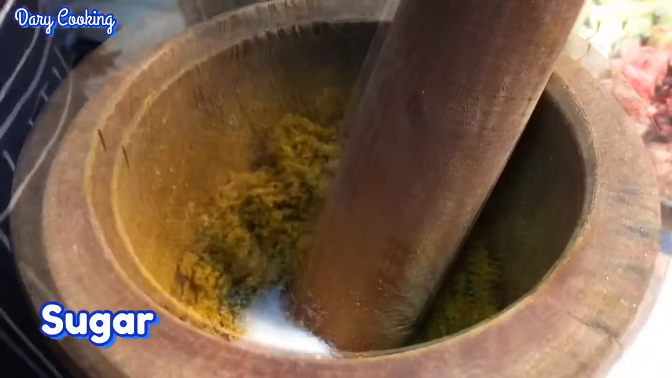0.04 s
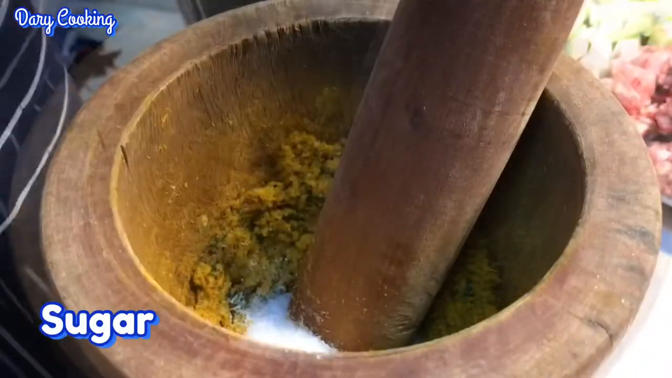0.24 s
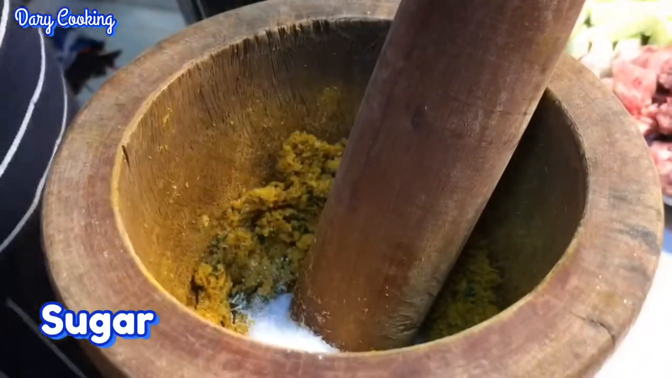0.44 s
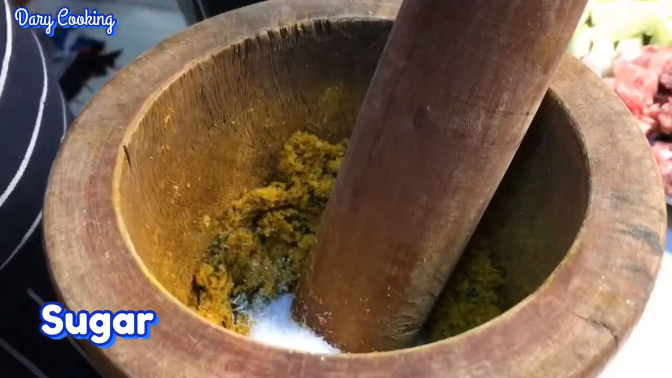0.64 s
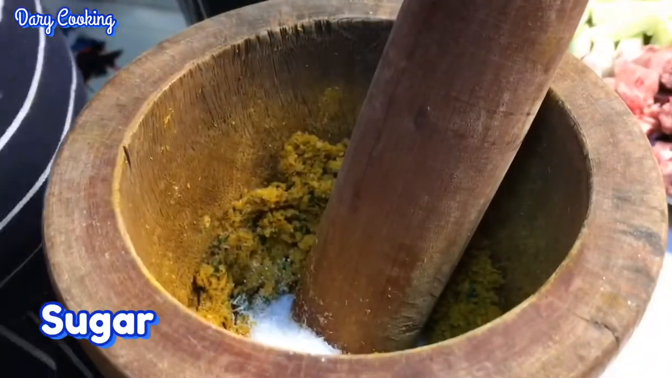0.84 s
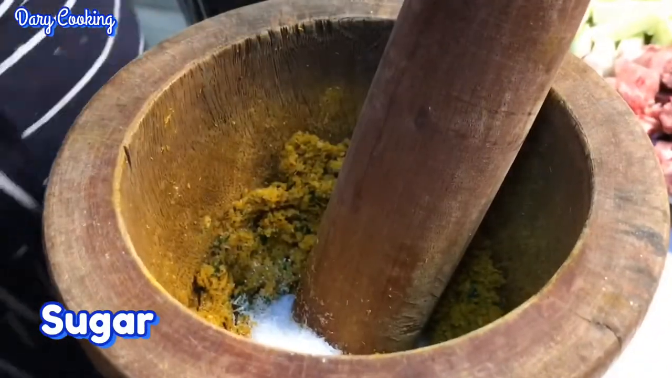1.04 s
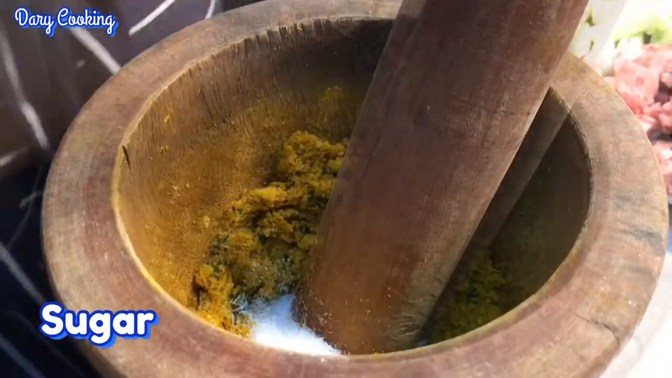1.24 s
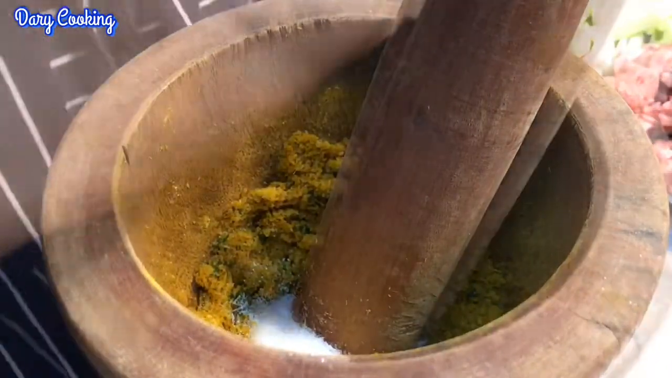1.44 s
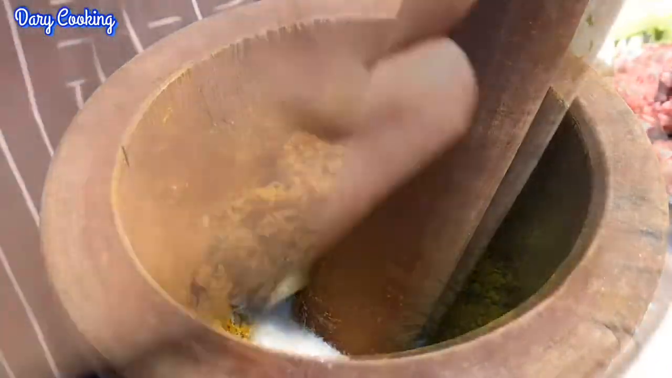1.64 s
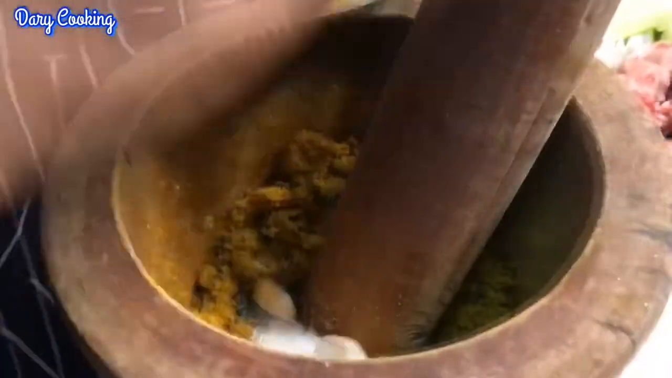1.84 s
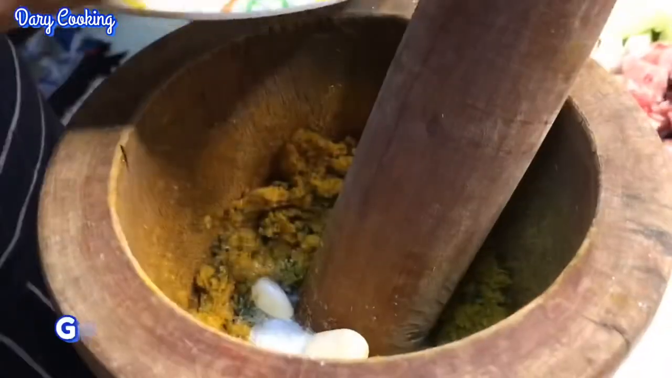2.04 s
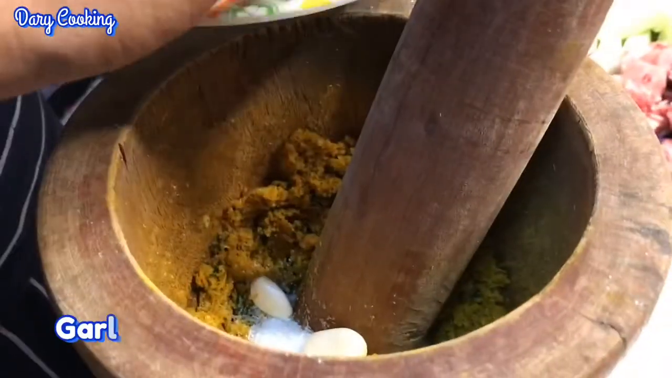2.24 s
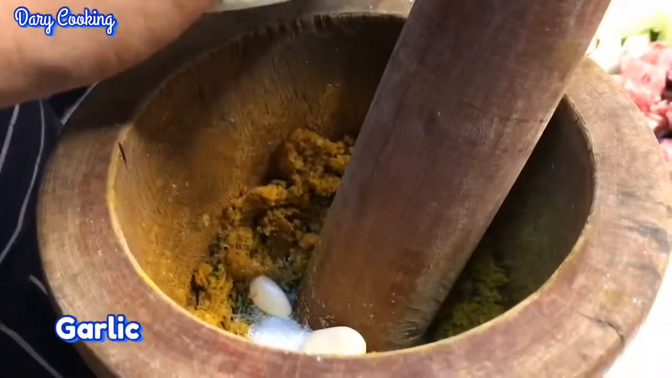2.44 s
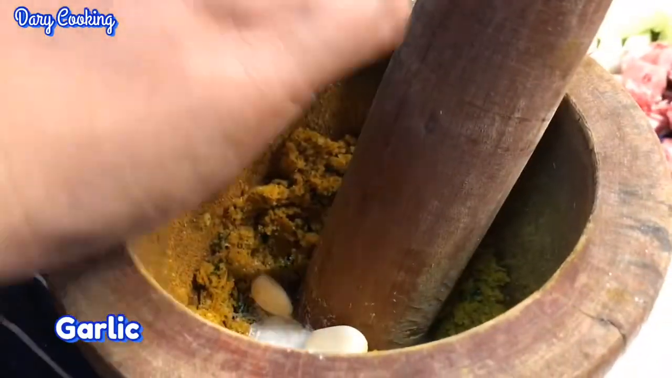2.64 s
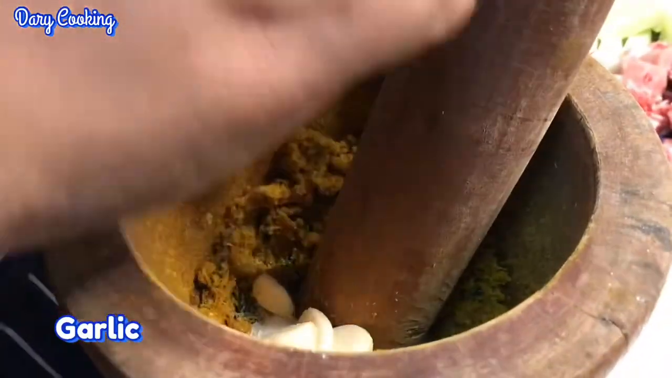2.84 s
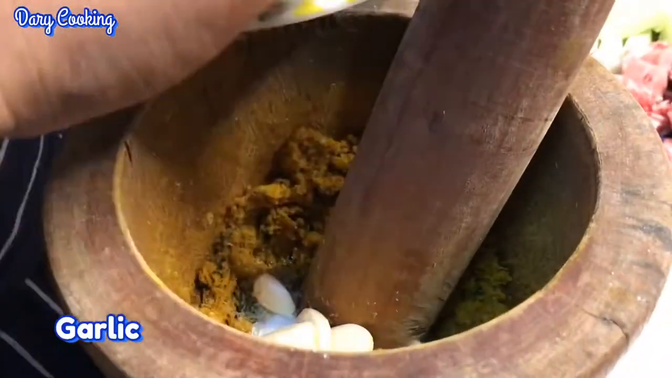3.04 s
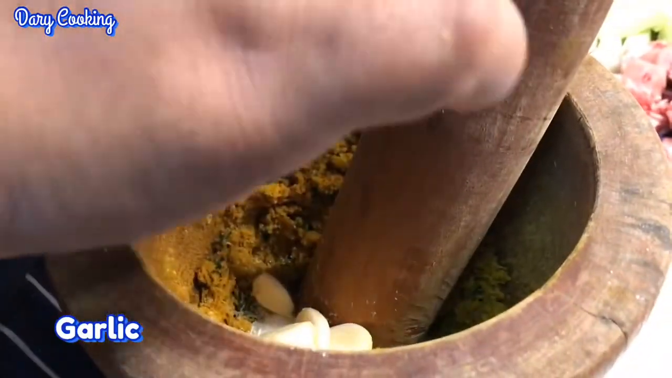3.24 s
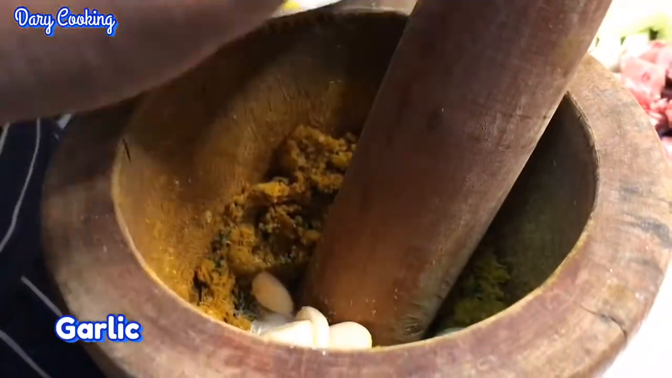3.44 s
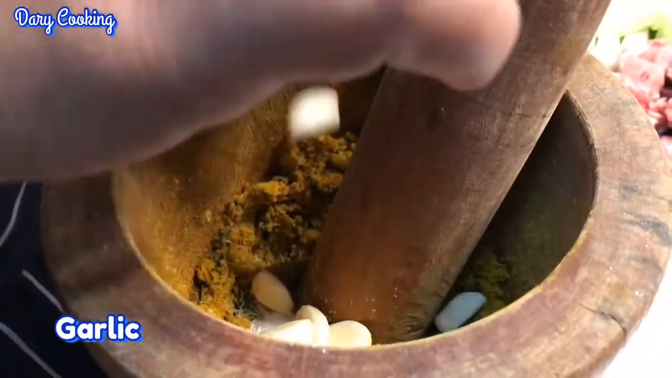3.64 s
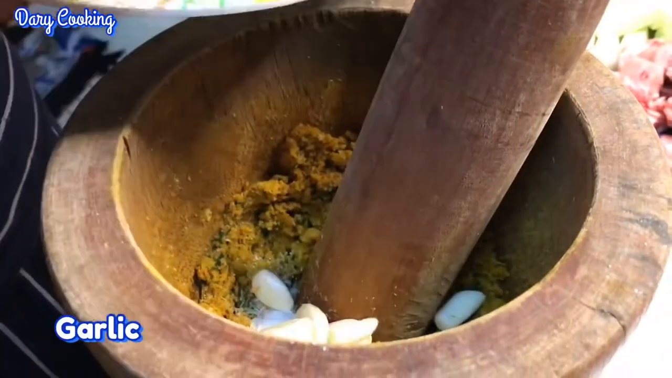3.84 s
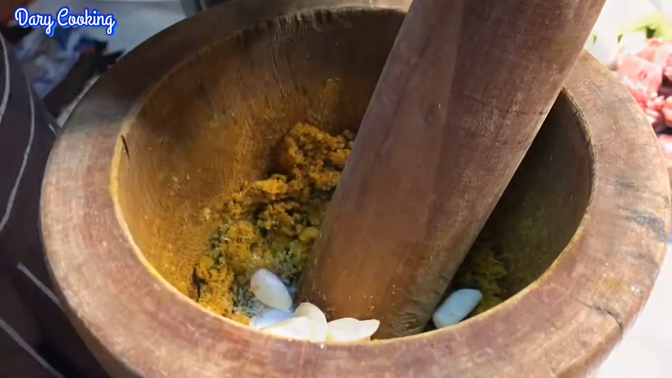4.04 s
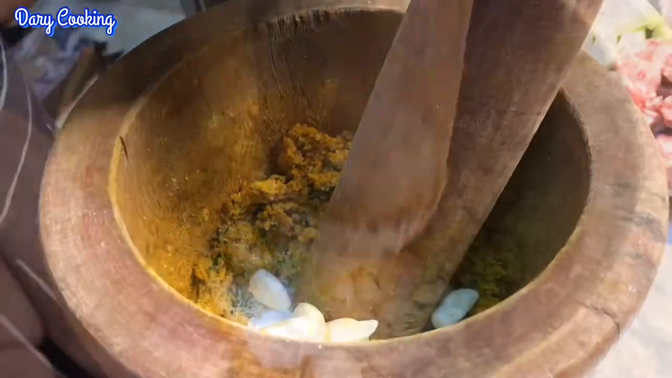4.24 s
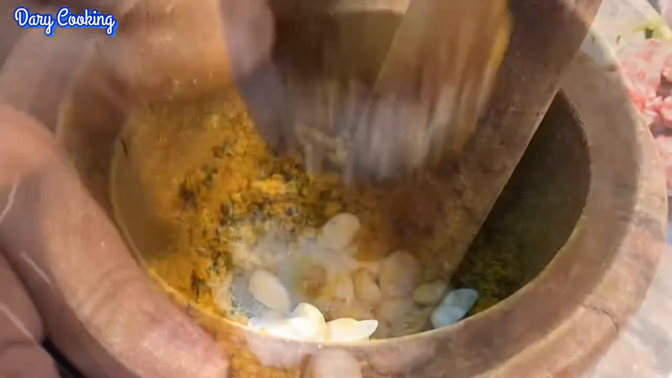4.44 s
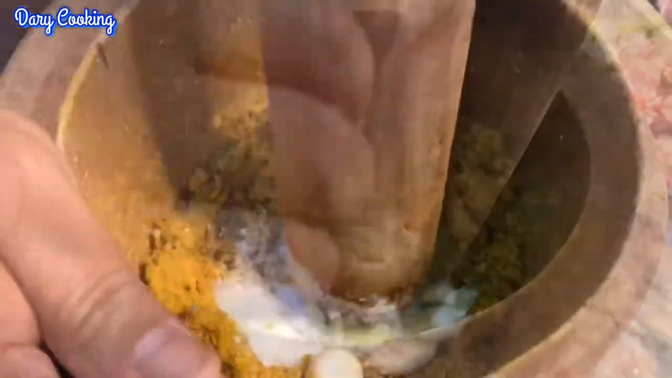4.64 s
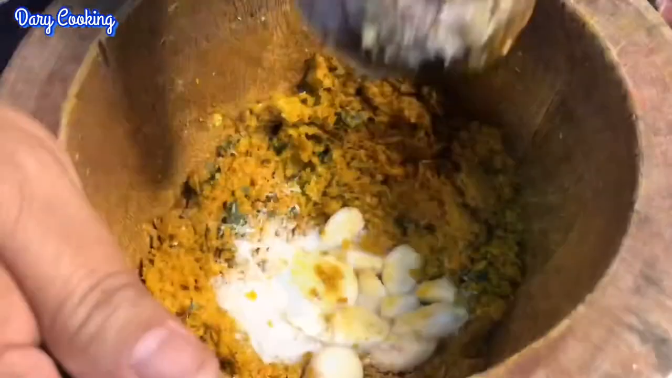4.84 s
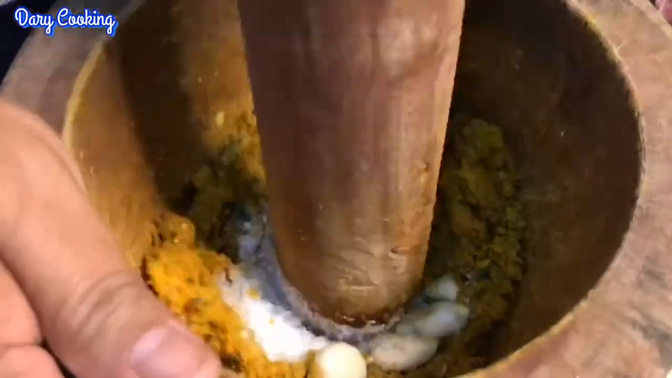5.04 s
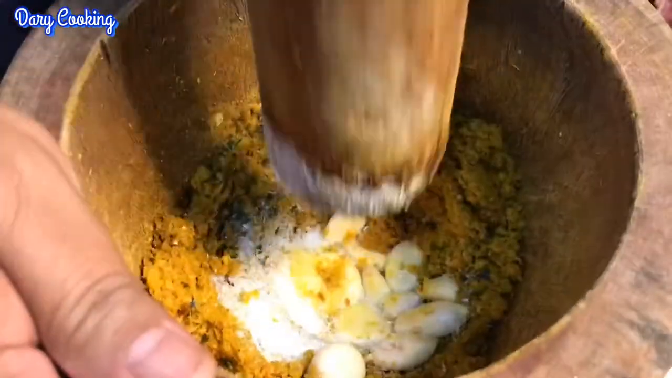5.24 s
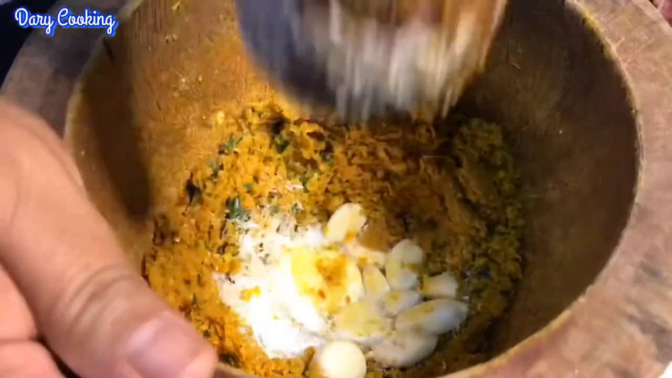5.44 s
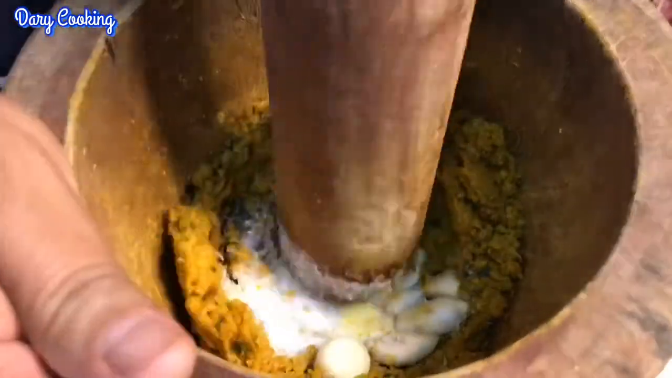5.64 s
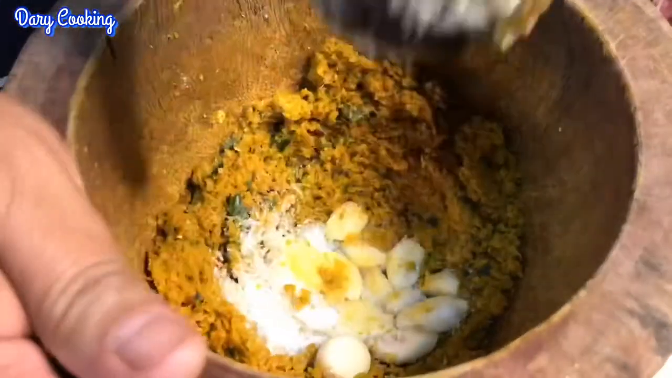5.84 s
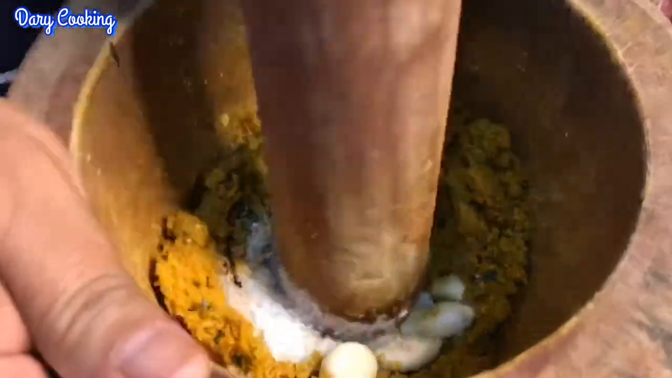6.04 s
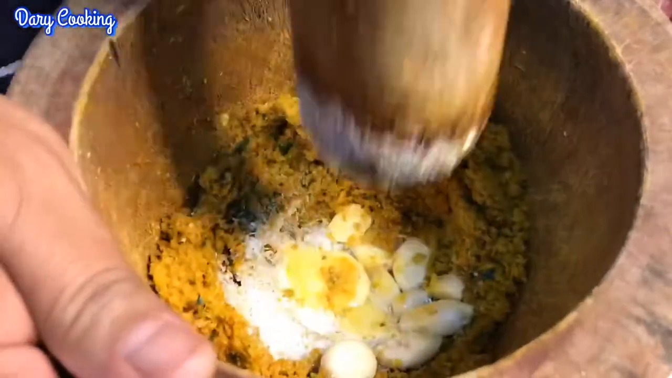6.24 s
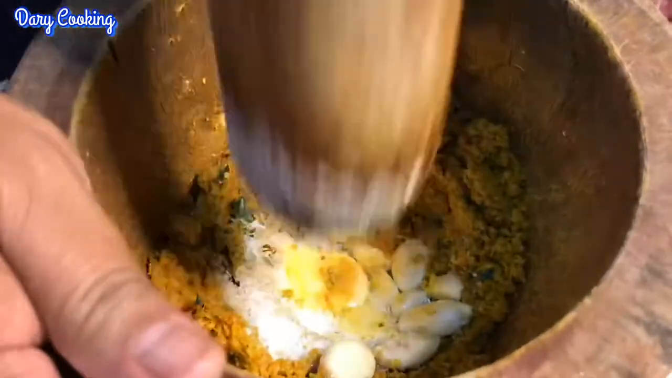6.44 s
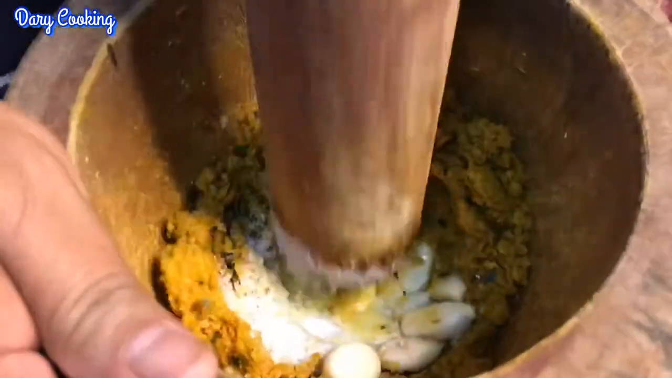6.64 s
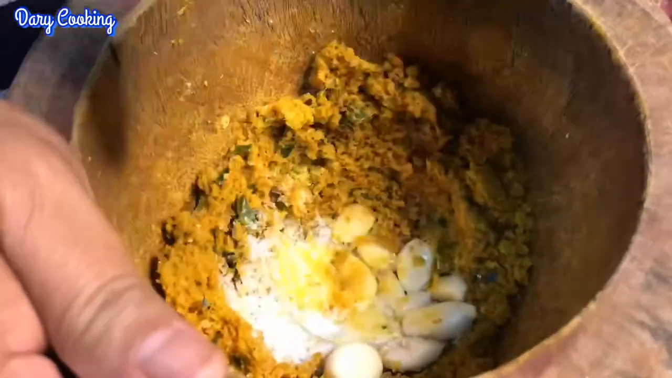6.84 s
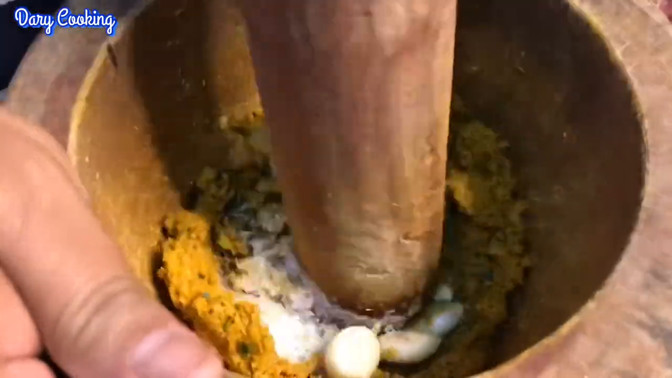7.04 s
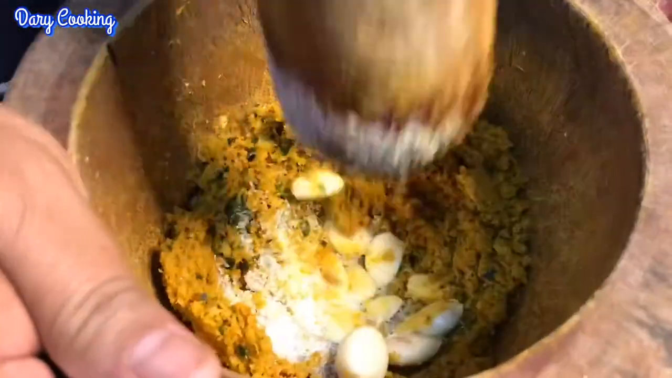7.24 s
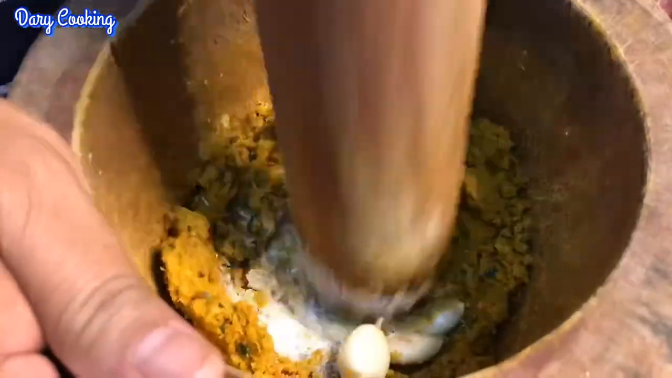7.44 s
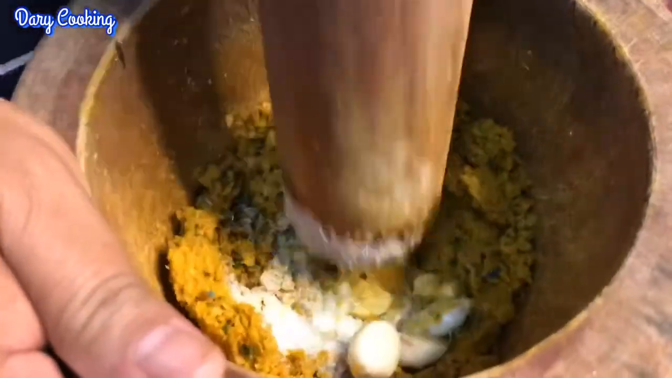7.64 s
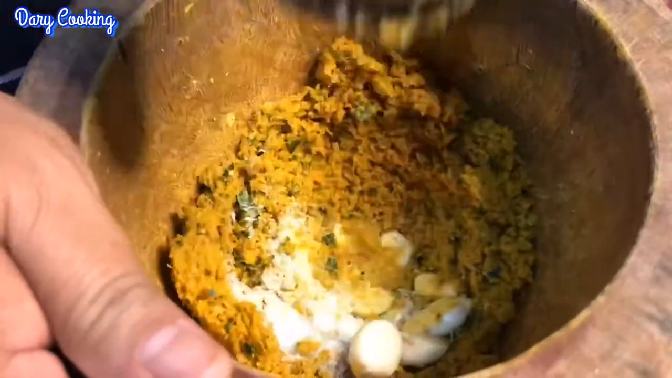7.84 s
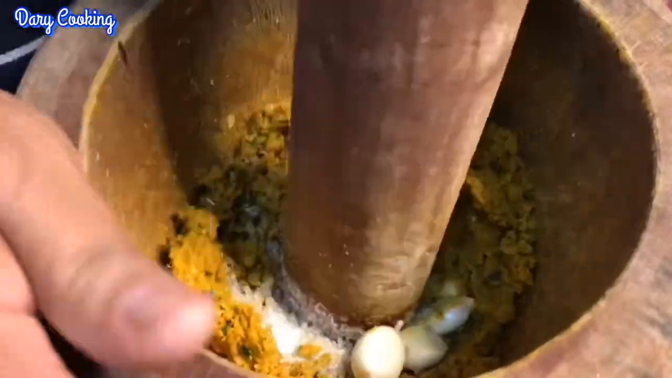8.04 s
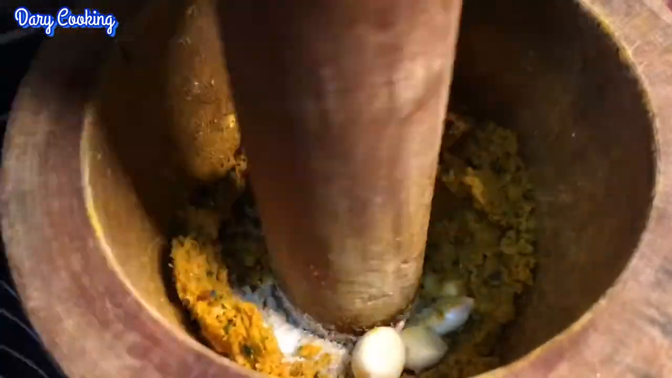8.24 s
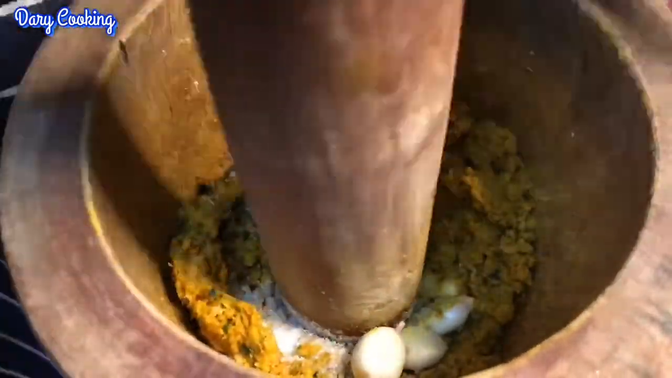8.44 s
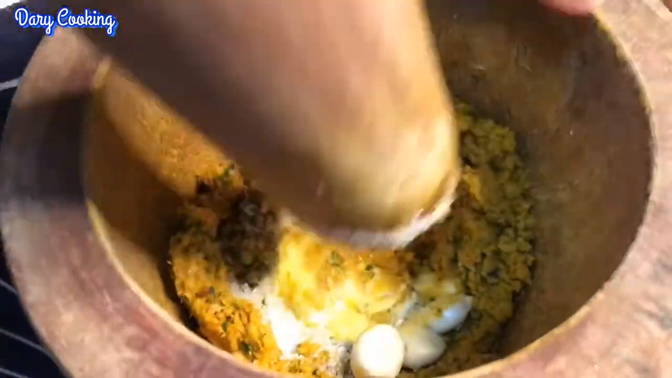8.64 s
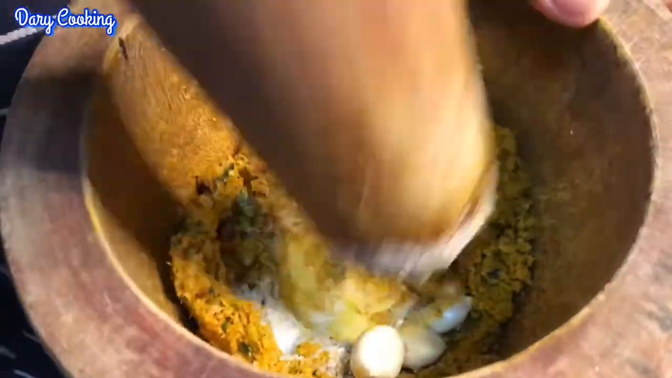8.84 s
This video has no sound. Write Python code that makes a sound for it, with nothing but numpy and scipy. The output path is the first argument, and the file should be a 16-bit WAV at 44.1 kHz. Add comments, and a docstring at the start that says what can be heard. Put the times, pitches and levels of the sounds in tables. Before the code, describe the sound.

Ringing spoon taps and a hard double clack in a dish open the scene, followed by quiet dry picking, light plate taps and soft clove knocks on wood. Then a pestle pounds evenly: crushed garlic and sugar crackle, the mortar thumps and hops on the counter, and a nearby metal bowl chatters. A gritty twisting rub fills a pause before one final blow. Close microphone, small lively kitchen, low background rush.

```python
"""A small knock and the bright taps of a steel spoon come first, over the low rush of a kitchen.
The spoon clacks down in a dish, fingers pick garlic cloves off a plate, and cloves drop into a big wooden mortar.
Nine pestle strokes follow: each crushes garlic and sugar, thuds, and sets the mortar hopping on the counter,
which shakes a nearby steel bowl into a short jingle. Before the last stroke the pestle twists in the paste.
Hard things are sums of fading sine waves; crushing, rubbing and knocks are noise shaped in colour and time."""
import sys
import numpy as np
from scipy import signal
from scipy.fft import rfft, irfft, next_fast_len
from scipy.io import wavfile
from scipy.ndimage import uniform_filter1d

SR = 44100
rng = np.random.default_rng(int(sys.argv[2]) if len(sys.argv) > 2 else 0)


def inscribe(sig):
    """Save sig as 16-bit PCM at rate SR to the path in sys.argv[1].

    A 1-D sig is mono; a 2-D sig holds one channel per row.
    Samples are clipped to [-1, 1] before scaling.
    """
    pcm = np.round(np.clip(np.atleast_2d(sig).T, -1, 1) * 32767)
    wavfile.write(sys.argv[1], SR, pcm.astype(np.int16))


N = 392490
T = np.arange(SR // 2) / SR  # time within one short sound [s]


def amp(db):
    """Turn decibels into a gain."""
    return 10 ** (np.asarray(db) / 20)


def unit(x):
    """Scale a signal to an average strength (rms) of 1."""
    return x / np.sqrt(np.mean(x ** 2) + 1e-20)


def along(points, hz):
    """Read a curve of (frequency [Hz], value) points, with pitch spaced evenly by octave."""
    point_hz, values = np.transpose(points)
    return np.interp(np.log(hz + 1), np.log(point_hz), values)


def coloured(x, spectrum):
    """Make some frequencies of x stronger than others, then scale it to rms 1."""
    gain = amp(along(spectrum, np.fft.rfftfreq(len(x), 1 / SR)))
    return unit(irfft(rfft(x) * gain, len(x)))


def noise(spectrum, size=len(T), gritty_db=0):
    """Coloured noise at rms 1; grit makes a few grains stand out."""
    grit = amp(gritty_db * rng.standard_normal(size))
    return coloured(rng.standard_normal(size) * grit, spectrum)


def narrow(hz, width_hz):
    """Noise in one narrow resonance, heard as a breathy note."""
    return noise([(max(hz - 6 * width_hz, 1), -60), (hz, 0), (hz + 6 * width_hz, -60)])


def fade(t60, t=T):
    """A steady dying away that drops 60 dB in t60 seconds."""
    return np.exp(-np.log(1000) * t / t60)


def clumps(depth_db, size=70):
    """An uneven gain of rms 1 that makes grains bunch within milliseconds."""
    wander = unit(uniform_filter1d(rng.standard_normal(len(T)), size))
    return unit(amp(depth_db * wander))


def ring(modes, detune=0, after_db=-120, after_t60=0.96, buzz=0, scatter=1):
    """One fading sine per mode (row), varied at each contact; loose contacts buzz, a free ring lasts on."""
    hz, db, t60 = np.transpose(modes)[:3, :, None]
    hz = hz * (1 + detune * rng.standard_normal(hz.shape))
    db = db + 1.5 * rng.standard_normal(hz.shape)
    flutter = uniform_filter1d(rng.standard_normal((len(hz), len(T))), size=150)
    decay = fade(t60) + amp(after_db) * fade(after_t60)
    turns = hz * T + scatter * (rng.random(hz.shape) - .5)
    phase = 2 * np.pi * turns + buzz * unit(flutter)
    return amp(db) * np.sin(phase) * decay * (1 - fade(.003))  # the last factor softens the start


def add(track, s, sound):
    """Mix a sound into the track at time s [s]."""
    start = min(max(round(s * SR), 0), N)
    track[start:start + len(sound)] += sound[:N - start]


# colour of the kitchen's rush: (frequency [Hz], relative level [dB])
QUIET_COLOUR = [(25, -2.5), (50, 2.5), (108, -4.5), (150, 2), (220, -4), (315, -3.5), (400, -12.5),
                (1050, -14.5), (1900, -20), (3200, -21), (6500, -29.5), (16000, -39.5)]


def quiet_kitchen(level_db=-49.5):
    """The low rush of the kitchen is steady noise, strongest in the bass."""
    return amp(level_db) * noise(QUIET_COLOUR, size=N)


# how long the kitchen echoes at each pitch: (frequency [Hz], t60 [s])
ROOM_DECAY = [(100, 1), (350, 0.69), (900, 0.59), (2500, 0.47), (6400, 0.38), (15000, 0.33)]


def room_answer(x, gap_s=.006):
    """The room's echo is noise whose treble dies first, drawn anew for each half second of sound."""
    out = np.zeros(N)
    for start in range(0, N, len(T)):
        hz, t, bands = signal.stft(rng.standard_normal(SR), SR, nperseg=256)
        fading = bands * fade(along(ROOM_DECAY, hz)[:, None], t)
        tail = signal.istft(fading, SR, nperseg=256)[1]
        answer = signal.fftconvolve(x[start:start + len(T)], tail / np.linalg.norm(tail))
        add(out, start / SR + gap_s, answer)
    return out


# dry ticks of fingers on garlic: (time [s], level [dB])
PICKS = [(1.62, -49), (1.701, -46.5), (1.784, -51), (2.675, -42.5), (3.034, -50), (3.283, -47.5),
         (3.337, -55), (3.667, -47.5)]
# colour of hard clacks, also used by other sources: (frequency [Hz], relative level [dB])
CLACK_COLOUR = [(500, -24.5), (1100, 7), (1600, 2.5), (2400, 2), (3500, -3), (6000, -40.5)]
# colour of bright ticks, also used by other sources: (frequency [Hz], relative level [dB])
TICK_COLOUR = [(2000, -11), (4500, 0), (9000, -6.5), (16000, -6.5)]


def fingers(dull_db=-2, t60=0.034):
    """Fingers pick cloves off a plate with faint, dry ticks: short bursts of noise."""
    out = np.zeros(N)
    for s, db in PICKS:
        touch = amp(dull_db) * noise(CLACK_COLOUR) + noise(TICK_COLOUR)
        add(out, s, amp(db) * touch * fade(t60))
    return out


# taps on the plate as cloves are picked off it: (time [s], level [dB])
PLATE_TAPS = [(2.121, -32.5), (2.436, -42), (3.472, -46.5), (3.511, -43), (3.664, -42.5)]
# ringing notes of the plate: (frequency [Hz], relative level [dB], t60 [s])
PLATE_MODES = [(1170, 3, 0.043), (1560, 5, 0.063), (2296, -8.5, 0.11), (3600, -15, 0.1)]


def plate(ring_db=-4, touch_db=-9, touch_t60=0.055):
    """A hand-held plate answers each light tap with a short, dull note."""
    out = np.zeros(N)
    for s, db in PLATE_TAPS:
        touch = (noise(CLACK_COLOUR) + noise(TICK_COLOUR) / 2) * fade(touch_t60)
        note = ring(PLATE_MODES, detune=.01, buzz=.4).sum(0)
        add(out, s, amp(db) * (amp(ring_db) * note + amp(touch_db) * touch))
    return out


# small knocks of utensils and falling cloves: (time [s], level [dB], weight [0-1], hardness [0-1])
KNOCKS = [(0.044, -37.5, 0.54, 0.96), (0.855, -26.5, 0.63, 0.89), (0.893, -31.5, 0.53, 0.87),
          (1.189, -41, 0.56, 0.98), (1.332, -35, 0.57, 0.93), (1.733, -44, 0.66, 0.98),
          (1.856, -22, 0.57, 0.51), (2.692, -35.5, 0.56, 0.97), (2.755, -43, 0.53, 0.95),
          (3.469, -40, 0.6, 0.6), (3.552, -27.5, 0.95, 0), (3.984, -29, 0.55, 0.89),
          (4.014, -25.5, 1, 0.07)]
# colour of the deep part of a knock: (frequency [Hz], relative level [dB])
THUMP_COLOUR = [(30, -14.5), (70, 1.5), (180, -11), (300, -15.5), (800, -59.5)]
# colour of the woody part of a knock: (frequency [Hz], relative level [dB])
BODY_COLOUR = [(150, -32.5), (330, 2), (450, -4.5), (600, 7), (850, -12), (1500, -39.5)]


def knocks(thump_db=-4, body_db=1, clack_db=0, tick_db=0, rebound_db=-10,
           light_loss_db=55, soft_loss_db=70, dent_t60=0.0048, count=3):
    """Things tumble to rest on wood: light ones lack bass, soft ones lack treble."""
    out = np.zeros(N)
    height = np.linspace(0, 1, 4)  # the four bands, from low to high
    for s, db, weight, hardness in KNOCKS:
        light_loss = light_loss_db * np.maximum(1 - weight - height, 0)
        soft_loss = soft_loss_db * np.maximum(height - hardness, 0)
        thump, body, clack, tick = -light_loss - soft_loss
        for k in range(count):
            drop_db = rebound_db * np.sqrt(k)
            low = amp(thump + thump_db) * noise(THUMP_COLOUR) * fade(0.18)
            low = low + amp(body + body_db) * noise(BODY_COLOUR) * fade(0.081)
            high = amp(clack + clack_db) * noise(CLACK_COLOUR) * fade(0.027)
            # rebounds lose extra treble: the drop counts twice for the tick
            high = high + amp(tick + tick_db + drop_db) * noise(TICK_COLOUR) * fade(0.068)
            add(out, s, amp(db + drop_db) * (low * (1 - fade(dent_t60)) + high))
            s = s + rng.uniform(0.0096, 0.025)
    return out


# the spoon clacks and rattles on a dish: (time [s], level [dB])
CLACKS = [(0.7297, -14.5), (.7387, -9), (0.7506, -21.5), (0.822, -31), (.863, -30.5), (1.338, -36.5)]
# ringing notes of the dish: (frequency [Hz], relative level [dB], t60 [s])
DISH_MODES = [(600, -4.5, 0.098), (1632, 4.5, 0.044), (2170, 3.5, 0.073), (2883, -1.5, 0.07),
              (3800, -3.5, 0.083)]


def dish(ring_db=-4, clack_db=-6.5, clack_t60=0.035, tick_db=-13, even_db=-16,
         brightening=0.07, pivot_hz=1700):
    """Short clacks on a dish: the harder the contact, the more its upper notes speak."""
    out = np.zeros(N)
    octaves_up = np.maximum(np.log2(np.array(DISH_MODES)[:, 0] / pivot_hz), 0)
    for s, db in CLACKS:
        contact = amp(clack_db) * noise(CLACK_COLOUR) + amp(tick_db) * noise(TICK_COLOUR)
        contact = contact * fade(clack_t60) * clumps(2.2)
        share = amp(ring_db + brightening * (db - even_db) * octaves_up)
        add(out, s, amp(db) * (share @ ring(DISH_MODES, detune=.015, buzz=.7) + contact))
    return out


# hollow notes as the spoon settles: (time [s], frequency [Hz], level [dB], glide [octaves/s])
HOLLOWS = [(0.732, 625, -20, -5.5), (0.825, 522, -18.5, -11.5), (0.859, 318, -24.5, 0.5),
           (.894, 577, -24, 0.5), (0.955, 616, -18.5, 2.2), (1.188, 334, -30, 1.5), (1.333, 344, -27.5, -2)]


def hollow(rise_t60=0.016, t60=0.09, slide_db=-48, slide_t60=0.37, low_hz=335, high_hz=630, width_hz=45):
    """A hollow note glides as the spoon's contact shifts; the spoon slides on, rubbing two low notes."""
    out = np.zeros(N)
    for s, hz, db, glide in HOLLOWS:
        phase = 2 * np.pi * np.cumsum(hz * 2 ** (glide * T)) / SR
        note = amp(db) * np.sin(phase) * fade(t60)
        slide = amp(slide_db) * (narrow(low_hz, width_hz) + narrow(high_hz, width_hz)) * fade(slide_t60)
        add(out, s, (note + slide) * (1 - fade(rise_t60)))
    return out


# spoon taps: (time [s], level [dB], place [0 tip - 1 neck], how firmly it rests on something [0-1])
TAPS = [(.155, -9, .02, 0.3), (.19, -11.5, 0.75, 0), (.219, -24.5, 0.36, 0), (.257, -11.5, 0.87, 0.14),
        (0.299, -22, 0.82, 0), (.331, -29.5, 0.57, 0), (.363, -30, 0.68, 0), (.7975, -12.5, 0.83, 0.28),
        (0.828, -13, 0.93, 0.74), (0.951, -14, 0.58, 0.87), (.96, -21.5, 0.67, 0.8), (1.199, -29, 1, 0.7)]
# ringing notes of the spoon:
# (frequency [Hz], relative level [dB], t60 before resting chokes it [s], place where a tap wakes it best [0-1])
SPOON_MODES = [(624, -20.5, .3, .2), (1384, -31, .55, .25), (3100, -25, .45, .85), (3163, -2.5, .05, 1),
               (3900, -30, .18, .35), (5010, -34, .32, .6), (6403, 0, .066, .1), (7490, -19, .15, .3),
               (8272, -22, .13, .25), (9160, -21, .15, .1), (9367, -22.5, .32, .85), (9966, -8.5, .07, .9),
               (11722, -8, .07, .3), (13825, -3, .09, .6), (15010, -15, .045, .6)]


def spoon(ring_db=2, tick_db=-7, tick_t60=0.0027, free_db=-17, neck_loss_db=7, off_place_db=33,
          rest_loss_db=10, rest_top_loss_db=45, rest_top_hz=10000, rest_t60=0.17, rest_rattle_s=0.012,
          shimmer_db=-27.0, shimmer_t60=0.095, shimmer_free_db=-19,
          rim_db=-26, rim_hz=10000, rim_t60=0.3, count=20):
    """The place struck picks the spoon's notes, over a high shimmer; resting chokes it and wakes the rim."""
    out = np.zeros(N)
    hz, _, _, best_place = np.transpose(SPOON_MODES)
    choke_db = rest_loss_db + rest_top_loss_db * np.maximum(np.log2(hz / rest_top_hz), 0)
    crowd_hz = np.linspace(8400, 15600, count) + 130 * rng.standard_normal(count)
    crowd = [(f, shimmer_db, shimmer_t60) for f in crowd_hz]
    for s, db, place, rest in TAPS:
        share = amp(ring_db - off_place_db * (place - best_place) ** 2 - rest * choke_db)
        modes = ring(SPOON_MODES, detune=.001, after_db=free_db - neck_loss_db * place, after_t60=.5, buzz=.4)
        steel = share @ modes
        shimmer = ring(crowd, after_db=shimmer_free_db, after_t60=.5, buzz=1).sum(0)
        tick = amp(tick_db) * noise(TICK_COLOUR) * fade(tick_t60 + rest * rest_rattle_s)
        rim = rest * amp(rim_db) * narrow(rim_hz, 300) * fade(rim_t60)
        choked = (steel + shimmer) * fade(rest_t60, rest * T)  # a firmer rest fades it faster
        add(out, s, amp(db) * (choked + tick + rim))
    return out


# pushes of the twisting wrist: (time of the height [s], level [dB])
TWISTS = [(8.22, -45), (8.325, -49), (8.465, -51.5)]
# sugar grains that crack under the twisting pestle: (time [s], level [dB])
CRACKS = [(8.3519, -45), (8.4165, -35.5)]
# the twisting pestle squeaks against the wood: (time [s], frequency [Hz], level [dB])
SQUEAKS = [(8.205, 1590, -43.5), (8.566, 1600, -56.5)]
# colour of the grinding paste: (frequency [Hz], relative level [dB])
PASTE_COLOUR = [(700, -11), (1800, -3.5), (4500, -8.5), (9000, -7.5), (15500, -11)]


def twist(push_width_s=0.051, crack_db=0, crack_t60=0.015, squeak_rise_s=0.013, squeak_width_hz=70):
    """The pestle turns in gritty paste: noise that catches unevenly and swells and ebbs with each push."""
    t = np.arange(N) / SR
    power = sum(amp(db) ** 2 / (1 + ((t - s) / push_width_s) ** 2) ** 2 for s, db in TWISTS)
    catching = unit(amp(3 * unit(uniform_filter1d(rng.standard_normal(N), size=250))))
    out = np.sqrt(power) * catching * noise(PASTE_COLOUR, size=N, gritty_db=5.5)
    for s, db in CRACKS:
        add(out, s, amp(db + crack_db) * noise(TICK_COLOUR) * fade(crack_t60))
    swell = T / squeak_rise_s * np.exp(1 - T / squeak_rise_s)
    for s, hz, db in SQUEAKS:
        add(out, s, amp(db) * narrow(hz, squeak_width_hz) * swell)
    return out


# ringing notes of the steel bowl, also used by bowl():
# (frequency [Hz], relative level [dB], t60 before any damping [s])
BOWL_MODES = [(2477, -7.5, .28), (3538, -2, .15), (4660, -3, .09), (5922, -1, .12), (7362, -4.5, .12),
              (8945, -6.5, .13), (10718, -15, .16), (12619, -12, .12), (14695, -17, .13)]


def rocking(start_s=7.05, period_s=0.024, level_db=-39, settle_db=3.5, tick_db=-5,
            main_hz=3800, spread_db=10, damped_t60=0.093, count=7):
    """After one stroke the bowl rocks on, touching down with a small, damped clink, ever more gently."""
    out = np.zeros(N)
    share = amp(-spread_db * np.abs(np.log2(np.array(BOWL_MODES)[:, 0] / main_hz)))
    for k in range(count):
        clink = share @ ring(BOWL_MODES, detune=.003) * fade(damped_t60)
        tick = amp(tick_db) * noise(TICK_COLOUR) * fade(.02)
        add(out, start_s + k * period_s, amp(level_db - settle_db * np.log2(k + 1)) * (clink + tick))
    return out


# pestle strokes, also used by thuds(), mortar() and crunch():
# (time [s], force [dB], crunch level [dB], crushing time [s], crispness [dB/octave],
#  jingle level [dB], the bowl's leading note [Hz])
STROKES = [(4.4856, -11, -18.5, 0.0093, -2, -14.5, 2477), (4.9883, -5.5, -18, 0.0089, 0.5, -6.5, 3538),
           (5.4813, -8, -15, 0.0082, -1.5, -8.5, 4660), (5.9538, -6, -14.5, 0.0079, -1, -8.5, 5922),
           (6.4375, -7.5, -11, 0.0073, -2, -8, 5922), (6.9328, -12, -17.5, 0.025, 0, -10, 3538),
           (7.4052, -5.5, -15, 0.01, -0.5, -6.5, 4660), (7.8932, -8.5, -17, 0.01, -1, -10.5, 2477),
           (8.8337, -4.5, -18, 0.0068, 0.5, -7.5, 4660)]
# the bowl's contacts after a stroke: (delay before a small random shift [s], level [dB])
JINGLE = [(.005, -1), (.022, 8), (.036, 4), (.05, 2), (.064, -10)]
# colour of the bowl's chatter on the counter: (frequency [Hz], relative level [dB])
CHATTER_COLOUR = [(700, 12), (1500, -13), (2800, -8), (3500, 11), (5200, 0), (9500, 3), (11000, -7),
                  (15500, -8)]


def bowl(ring_db=-24.5, chatter_db=-23, chatter_t60=0.056, after_db=-26, after_db_per_octave=-10,
         strongest_db=5, choke_t60=0.51):
    """The jolt sets a steel bowl chattering; each contact chokes the last ring, and low notes linger."""
    out = np.zeros(N)
    hz = np.array(BOWL_MODES)[:, 0]
    linger_db = after_db + after_db_per_octave * np.log2(hz / hz.min())[:, None]
    choke = choke_t60 * (hz.min() / hz[:, None]) ** 2  # high notes are choked fastest
    flights = np.append(np.diff(np.array(JINGLE)[:, 0]), T[-1])  # time until the next contact
    for s, *_, db, note_hz in STROKES:
        leads = np.arange(len(hz)) == np.argmin(np.abs(hz - note_hz))
        share = amp(ring_db + strongest_db * leads)
        for (delay, contact_db), flight in zip(JINGLE, flights):
            modes = ring(BOWL_MODES, detune=.0015, after_db=linger_db, buzz=.6)
            steel = share @ (modes * fade(choke, np.maximum(T - flight, 0)))
            chatter = noise(CHATTER_COLOUR, gritty_db=3) * fade(chatter_t60) * clumps(2.6)
            contact = steel + amp(chatter_db) * chatter
            add(out, s + delay + .0012 * rng.standard_normal(), amp(db + contact_db) * contact)
    return out


# the blow and the mortar's hops after it, also used by mortar():
# (delay [s], push level [dB], typical softness [s], knock level [dB])
HOPS = [(0, -3.5, .0015, -3), (0.0108, -1.5, 0.0021, 2.5), (.025, -5, .0027, -3.5), (.045, -8, 0.0014, -4)]
# colour of the room's low boom: (frequency [Hz], relative level [dB])
BOOM_COLOUR = [(50, -1.5), (85, 10.5), (118, 3), (155, 9), (205, 4), (290, -4), (900, -55)]


def thuds(push_db=5, boom_db=-16, boom_t60=1.07, boom_rise_s=0.0056):
    """Each hop pushes the counter down once; the room's low modes boom on, much alike every stroke."""
    out, t = np.zeros(N), np.arange(SR) / SR
    lead = T[-1] / 20  # room for the pulse to begin before its centre
    room_modes = noise(BOOM_COLOUR, size=SR)
    for s, db, *_ in STROKES:
        for delay, hop_db, soft, _ in HOPS:
            u = (T - lead) / (soft * np.exp(0.051 * rng.standard_normal()))
            push = (u * u - 1) * np.exp(-u * u / 2)  # the air follows the acceleration of a smooth dent
            add(out, s + delay - lead, amp(db + hop_db + push_db) * push)
        boom = unit(room_modes + noise(BOOM_COLOUR, size=SR))
        boom = boom * fade(boom_t60, t) * (1 - np.exp(-t / boom_rise_s))
        add(out, s, amp(db + boom_db) * boom)
    return out


# ringing notes of mortar and counter: (frequency [Hz], relative level [dB], t60 [s])
WOOD_MODES = [(160, -4.5, 0.13), (197.3, 5, 0.15), (234.15, 5, 0.28), (279.7, -1.5, 0.31),
              (352.2, -4.5, 0.16), (387.7, -6, 0.39), (577, -1.5, 0.078), (718, -13.5, 0.36)]
# colour of the wooden knock: (frequency [Hz], relative level [dB])
KNOCK_COLOUR = [(150, -30), (300, 5), (600, 7.5), (1700, -3.5), (2600, -12), (4000, -11.5), (6000, -31)]


def mortar(ring_db=-14, knock_db=-8.0, knock_t60=0.15, ring_lead_s=.0013, knock_lead_s=.003,
           cushion_db_per_s=604):
    """The wood knocks at each hop and rings briefly in step with the push, damped by paste and hand."""
    out = np.zeros(N)
    for s, force_db, _, crush, *_ in STROKES:
        for delay, _, _, hop_db in HOPS:
            # the longer the garlic takes to give way, the softer the wood knocks
            strength = amp(force_db - cushion_db_per_s * crush + hop_db)
            wood = ring(WOOD_MODES, detune=0.0173, scatter=0.27).sum(0)
            add(out, s + delay - ring_lead_s, -strength * amp(ring_db) * wood)
            knock = noise(KNOCK_COLOUR) * fade(knock_t60) * clumps(3.0)
            add(out, s + delay - knock_lead_s, strength * amp(knock_db) * knock)
    return out


# colour of breaking garlic and sugar: (frequency [Hz], relative level [dB])
CRUNCH_COLOUR = [(200, -12), (550, 1.5), (950, -6.5), (1500, 3.5), (3200, -0.5), (4400, -4), (6300, -2.5),
                 (9000, -7), (15500, -9)]


def crunch(level_db=2.5, swell=0.9, release_t60=0.014, touch_db=-17, lead_growth_s=.0021, clump_db=1.45,
           again_s=0.0037, again_db=-5, again_t60=0.027):
    """The pestle touches the heap, earlier as paste builds up; garlic and sugar break, then crack again."""
    out = np.zeros(N)
    for k, (s, _, db, crush, crisp, *_) in enumerate(STROKES):
        press = np.minimum(T / (crush * 0.51), 1) ** swell
        pressure = press * fade(release_t60, np.maximum(T - crush * 0.71, 0))
        colour = [(hz, level + crisp * np.log2(hz)) for hz, level in CRUNCH_COLOUR]
        breaking = noise(colour, gritty_db=3) * clumps(clump_db)
        add(out, s - crush - .001, amp(db + level_db) * pressure * breaking)
        touch = noise(CRUNCH_COLOUR) * fade(0.015)
        add(out, s - max(crush, k * lead_growth_s), amp(db + touch_db) * touch)
        add(out, s + again_s, amp(db + again_db) * noise(CRUNCH_COLOUR) * fade(again_t60))
    return out


def scene():
    """Every source is heard close by, with the room's answer, over the low rush of the kitchen."""
    handling = fingers() + plate() + knocks() + dish() + hollow() + spoon() + twist()
    pounding = rocking() + bowl() + mortar() + crunch()
    room = room_answer(amp(-11.5) * (pounding + handling / 2))
    return (quiet_kitchen() + room + handling + pounding + thuds())[None]


def record(dry, low_cut_hz=37, top_hz=16000):
    """The microphone drops the deepest bass, rounds off the loudest peaks and stops at a top frequency."""
    size = next_fast_len(N + SR)
    hz = np.fft.rfftfreq(size, 1 / SR)
    heard = irfft(rfft(dry, size) * hz ** 4 / (hz ** 4 + low_cut_hz ** 4), size)
    rounded = heard / (1 + np.abs(heard / .96) ** 8) ** (1 / 8)
    return irfft(rfft(rounded) / np.sqrt(1 + (hz / top_hz) ** 160), size)[:, :N]


dry = scene()
out = record(dry)
inscribe(out)
```